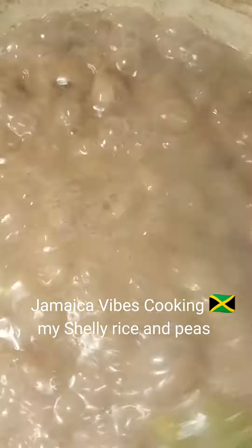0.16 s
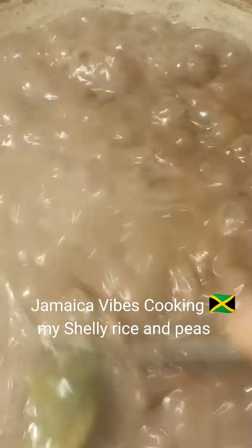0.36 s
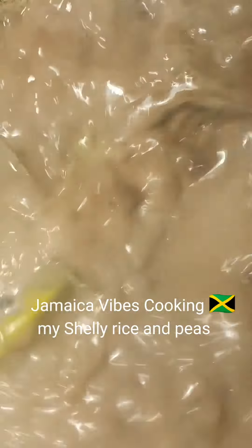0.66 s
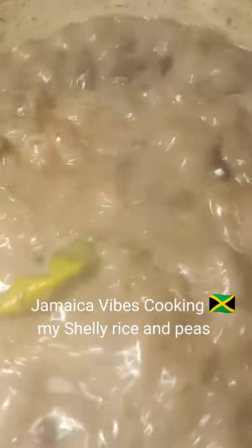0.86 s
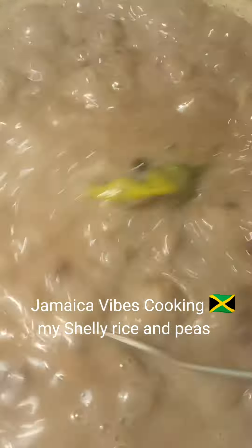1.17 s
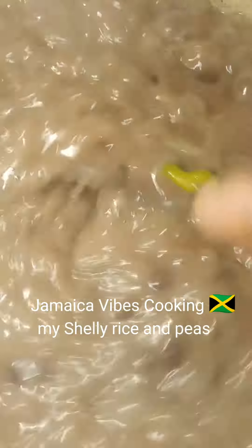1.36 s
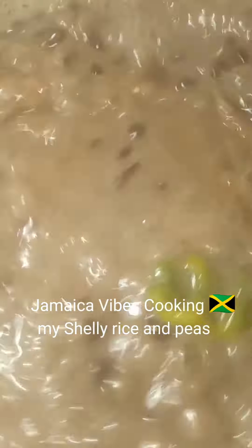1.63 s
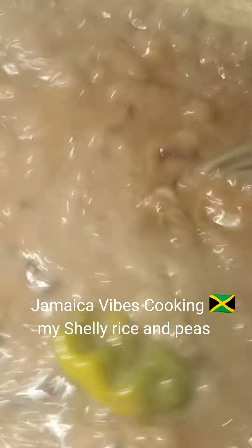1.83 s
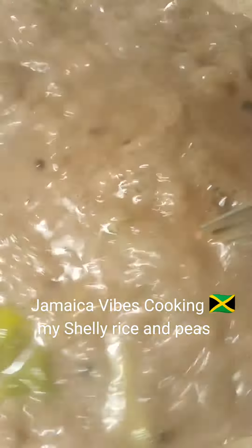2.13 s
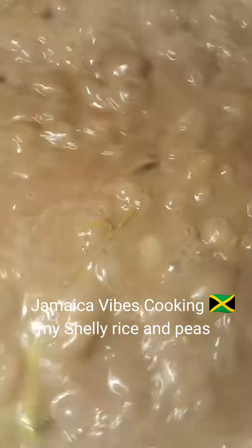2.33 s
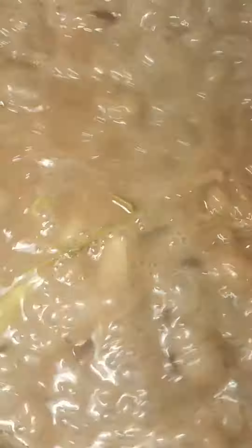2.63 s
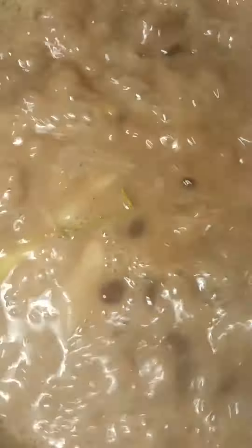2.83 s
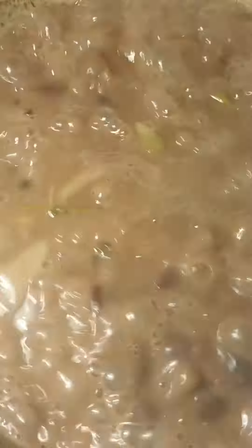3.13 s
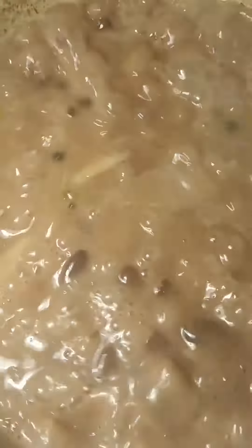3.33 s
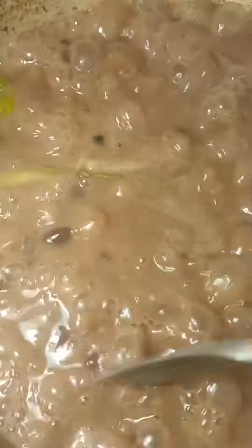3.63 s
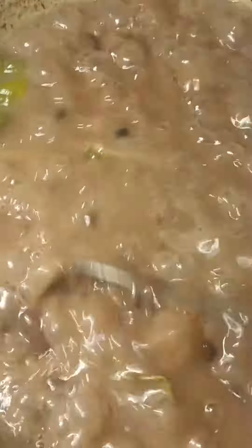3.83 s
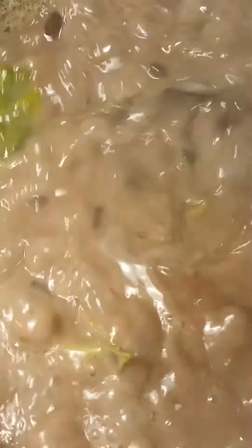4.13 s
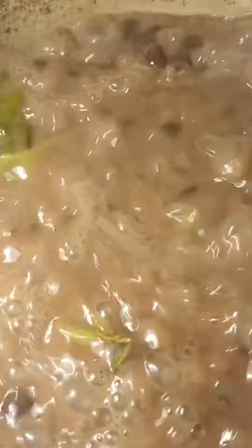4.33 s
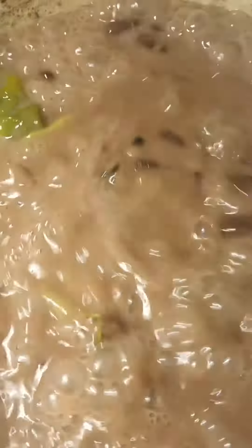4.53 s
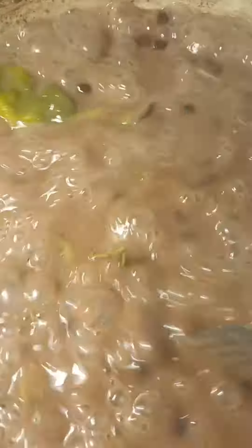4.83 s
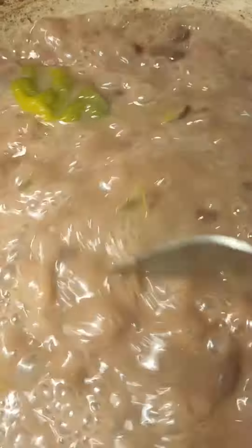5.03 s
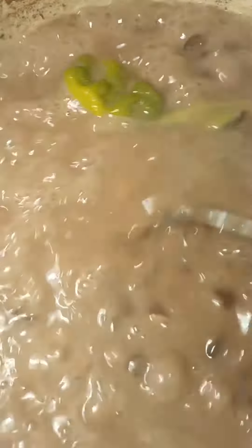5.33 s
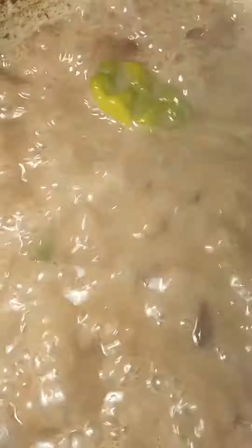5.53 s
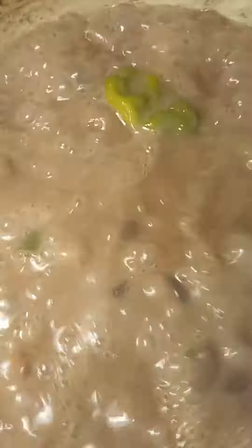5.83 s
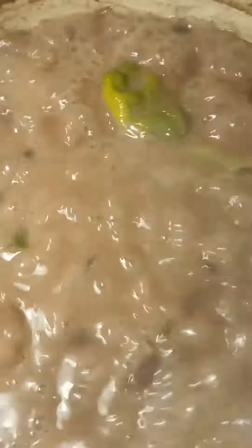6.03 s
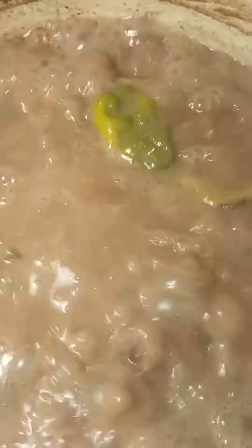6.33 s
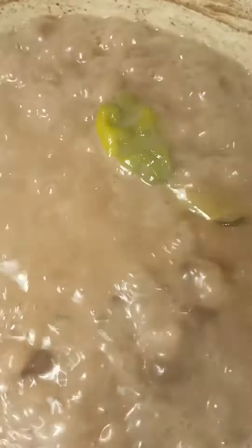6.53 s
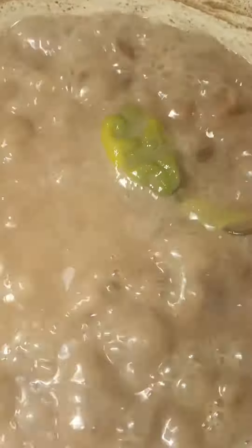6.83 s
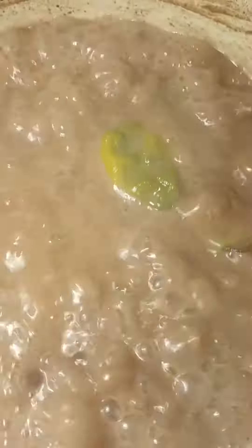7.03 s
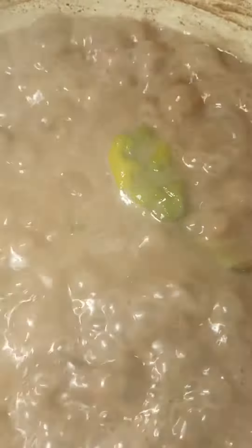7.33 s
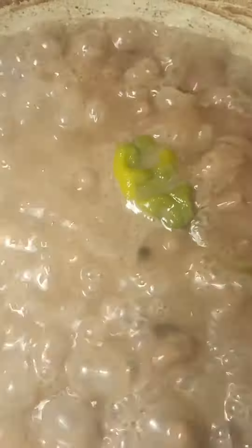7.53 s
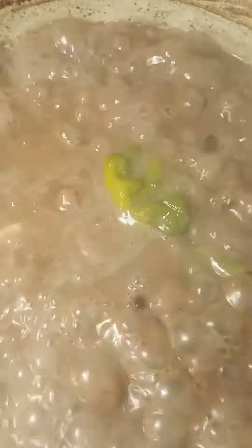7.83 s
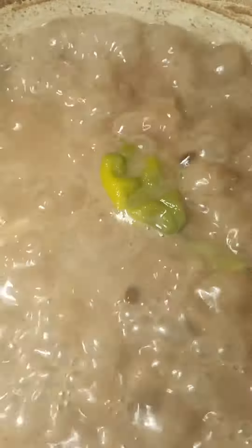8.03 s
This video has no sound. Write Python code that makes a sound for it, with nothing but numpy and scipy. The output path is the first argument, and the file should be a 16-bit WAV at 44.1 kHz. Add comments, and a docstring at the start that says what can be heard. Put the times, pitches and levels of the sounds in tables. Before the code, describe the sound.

Thick rice and beans boil vigorously, heard very close from above on a hand-held phone. Irregular wet plops, low glugs and tiny crackles ride on steady froth. Almost at once a hard scuff, click and bump hits the case; softer finger rubbing follows between two and three and a half seconds, then mostly bubbling over faint burner rumble.

```python
"""A thick pot on the boil

Thick rice and peas boil hard, heard from close above through the two microphone ports of a hand-held phone.
Steam bubbles burst as short rising tones that bounce off the pot's wall, over crackle and froth made of noise.
Fingers on the phone give a hard scuff and bump early on, then softer rubbing, squeaks and clicks:
shaped noise for the skin, fading notes for the case. Low noise and a faint hum make the burner's background."""
import sys
import numpy as np
from scipy import signal
from scipy.fft import rfft, irfft, next_fast_len
from scipy.io import wavfile

SR = 44100
rng = np.random.default_rng(int(sys.argv[2]) if len(sys.argv) > 2 else 0)


def master(y):
    """Save y as 16-bit WAV."""
    cut = np.clip(np.atleast_2d(y).T, -1, 1)
    pcm = np.round(cut * 32767)  # scale
    wavfile.write(sys.argv[1], SR, pcm.astype(np.int16))


N = 361179
TIME = np.arange(N) / SR  # s
TOP_HZ = 15700  # the phone passes little above this


def undb(db):
    """Turn decibels into a gain."""
    return 10 ** (np.asarray(db) / 20)


def unit(x):
    """Scale to an rms (average strength) of 1."""
    return x / np.sqrt(np.mean(x ** 2))


def pan(db):
    """Gains for left and right, given left minus right in dB."""
    return undb(np.array([[db], [-db]]) / 2)


def curves(table):
    """Join the points of each column into a line through time; the first column is the time in s."""
    s, *columns = np.transpose(table)
    return [np.interp(TIME, s, column) for column in columns]


def colour(x, points):
    """Make each frequency louder or softer, following a curve of (f/Hz, level/dB) points."""
    size = next_fast_len(N + 4096)
    hz, db = np.transpose(points)
    f = np.maximum(np.arange(size // 2 + 1) * SR / size, 1)
    gain = undb(np.interp(np.log(f), np.log(hz), db))
    return irfft(rfft(x, size) * gain, size)[..., :N]


def resonate(x, hz, width_hz):
    """Let one hollow or part ring: a resonance with gain 1 at its centre."""
    hz = min(hz, 0.45 * SR)
    b, a = signal.iirpeak(hz, hz / width_hz, fs=SR)
    return signal.lfilter(b, a, x)


def walk(rate):
    """Wander between random values, drawn rate times a second, with a spread near 1."""
    knots = rng.standard_normal(4096)
    return np.interp(TIME * rate, np.arange(len(knots)), knots) * np.sqrt(3 / 2)


def add(out, s, sound):
    """Mix a sound in, starting at s seconds."""
    i = max(int(s * SR), 0)
    out[:, i:i + sound.shape[1]] += sound[:, :max(N - i, 0)]


def echoes(x, decay_s, db):
    """Many close reflections blur into a fading random tail, different at each port."""
    rise_s = 0.0029
    t = TIME[:SR // 3]
    tail = rng.standard_normal((2, len(t))) * np.exp(-t / decay_s) * (1 - np.exp(-t / rise_s))
    tail /= np.sqrt(np.sum(tail ** 2, axis=1, keepdims=True))
    return undb(db) * signal.fftconvolve(x, tail, axes=1)[:, :N]


def pot():
    """Big plops, deep glugs, small blips and crackle, thrown back by the pot's wall and the kitchen."""
    # how hard the pot boils: t/s, level/dB
    boil_points = [(0, 4), (1.25, 3.5), (1.55, -0.5), (1.85, 2.5), (2.4, -1.5), (3.9, 1.5), (4.55, 5),
                   (4.9, -2.5), (5.4, .5), (7, 1.5), (8.19, 3)]
    # the loudest bubbles bursting: t/s, peak level before echoes and colouring/dB, cavity pitch f/Hz,
    # ring length/cycles
    loud_plops = [(.0622, -28.5, 627, 1.1), (.1643, -29.5, 800, 1.3), (.1832, -16.5, 2300, 2.7),
                  (.431, -33, 684, 0.89), (.4945, -31.5, 910, 1.8), (.5275, -31, 755, 2.4),
                  (.5503, -28.5, 1620, 4), (.6319, -30.5, 1180, 4.5), (.654, -33.5, 1540, 4),
                  (.7706, -35, 1660, 4.3), (1.0049, -25.5, 1155, 3.3), (1.0952, -30, 1630, 1.2),
                  (1.18, -31, 1400, 2), (1.2736, -30.5, 820, 0.61), (1.8118, -31.5, 1210, 1.9),
                  (1.868, -29, 2300, 1.9), (1.972, -34.5, 1170, 4.5), (2.3756, -32.5, 1160, 2.2),
                  (2.5556, -34, 1040, 1), (2.868, -29.5, 750, 1.2), (3.443, -19.5, 1120, 2),
                  (3.881, -31.5, 770, 1), (3.9065, -26, 2070, 0.92), (3.9758, -29.5, 950, 0.76),
                  (3.9881, -26.5, 950, 1.4), (3.9997, -29, 1150, 2.4), (4.1076, -33.5, 1530, 1.1),
                  (4.2213, -34, 1130, 2.1), (4.391, -33.5, 2240, 3.9), (4.513, -36.5, 1000, 1.6),
                  (4.6015, -32.5, 1130, 2.3), (4.6528, -28, 1160, 3.1), (5.149, -35.5, 875, 1.7),
                  (5.6664, -34, 1330, 3.6), (5.7553, -34, 1100, 1.4), (5.9627, -20, 2610, 5.4),
                  (6.054, -30, 2130, 5.6), (6.0658, -29.5, 1260, 0.93), (6.515, -35.5, 1080, 4.2),
                  (6.5382, -32.5, 966, 3.5), (6.785, -32.5, 1180, 1.4), (6.93, -37, 670, 2.5),
                  (6.984, -38, 1390, 6.5), (7.0935, -34.5, 1030, 1.6), (7.175, -29.5, 1530, 1.9),
                  (7.2246, -30, 1020, 2.3), (7.295, -31, 1220, 1.1), (7.3064, -34, 690, 1.2),
                  (7.3433, -28, 1000, 1.9), (7.53, -39.5, 2680, 7), (7.7816, -32, 1290, 1.3),
                  (7.79, -31, 1190, 1.5), (7.838, -32, 1170, 3.7), (7.8817, -32, 1300, 1.7),
                  (7.9335, -26.5, 1120, 1.1), (7.9534, -32, 990, 0.76), (8.0218, -27.5, 1160, 1.5)]
    # the air in the pot favours some pitches: f/Hz, level/dB
    pot_air = [(300, -2), (530, 1.5), (700, 3), (830, -1), (1050, 1.5), (1280, 2.5), (1500, -0.5),
               (1900, 1), (2700, -5), (3300, -3), (5000, -0.5)]

    boil_db, = curves(boil_points)
    all_plops = np.vstack([loud_plops, lesser_plops(boil_db, count=60)])
    burst = plops(all_plops)
    burst += undb(-48.0) * swarm(boil_db, hz=415, octaves=0.47, cycles=1.0, spread_db=2.5, count=600)  # glugs
    burst += undb(-48.0) * swarm(boil_db, hz=1207, octaves=0.51, cycles=0.93, spread_db=5.0, count=900)  # blips
    burst += undb(-47.0) * swarm(boil_db, hz=7300, octaves=0.56, cycles=1.7, spread_db=3.0, count=500)  # crackle

    # the pot lies a little towards the right port, so its sound reaches the left one softer and later
    burst = pan(-4) * colour(burst, pot_air)
    left_lag_s = 0.00027
    burst[0] = np.interp(TIME - round(left_lag_s * SR) / SR, TIME, burst[0])

    wall = echoes(burst, decay_s=0.0056, db=-9)
    kitchen = echoes(burst, decay_s=0.024, db=-11.5)
    return burst + wall + kitchen + froth(boil_db, pot_air)


def plops(rows):
    """Each big bubble rings at several pitches, and its skin snaps open and falls back."""
    out = np.zeros((2, N))
    chance = 2 * rng.random((len(rows), 3)) - 1
    for (s, db, hz, cycles), (place, shape, delay) in zip(rows, chance):
        gain = undb(db) * pan(2 * place)
        add(out, s, gain * bubble(hz, cycles))
        # a lopsided cavity has a second, higher mode
        add(out, s, gain * undb(-8.0) * bubble(hz * (1.227 + 0.14 * shape), cycles))
        # the opened hollow below it rings lower
        add(out, s, gain * undb(-14) * bubble(hz * 0.64, cycles / 2))
        # the skin snaps as it tears
        add(out, s, gain * undb(-8) * bubble(hz=1600, cycles=0.6))
        # it smacks again as it falls back, a few milliseconds later
        smack_s = s + 0.0065 + 0.003 * delay
        add(out, smack_s, gain * undb(-6) * bubble(hz * 0.89, cycles=0.9))
    return out


def bubble(hz, cycles, glide=0.032):
    """The cavity swells as it opens, then rings a few cycles; its pitch rises as the hole widens."""
    turn = np.arange(int(6 * cycles / hz * SR) + 2) * hz / SR  # cycles since the start
    age = turn / cycles
    swell = (1 - np.exp(-2 * age)) * np.exp(-age ** 1.56)
    tone = np.sin(2 * np.pi * turn * (1 + glide * np.tanh(age)))
    return swell / swell.max() * tone


def lesser_plops(boil_db, count):
    """Softer plops come at random, more often and louder as the boil rises; rows as in the plop table."""
    level_db, spread_db = -42.5, 1.5
    middle_hz, spread_octaves = 1146, 0.44
    ring_s = 0.0027  # the same ring time whatever the pitch
    # sharing out the steam evenly crowds the plops where the pot boils hardest
    steam = np.cumsum(undb(boil_db))
    share = (np.arange(count) + rng.random(count)) / count
    at = np.searchsorted(steam / steam[-1], share)
    size, pitch = np.clip(rng.standard_normal((count, 2)), -1.7, 1.7).T
    hz = middle_hz * 2 ** (spread_octaves * pitch)
    db = level_db + boil_db[at] + spread_db * size
    return np.column_stack([TIME[at], db, hz, hz * ring_s])


def swarm(boil_db, hz, octaves, cycles, spread_db, count):
    """Small bubbles burst at random times, sizes and places, louder as the boil rises."""
    out = np.zeros((2, N))
    chance = np.clip(rng.standard_normal((count, 4)), -1.7, 1.7)
    times = rng.random(count) * TIME[-1]
    for s, (pitch, size, ring, side) in zip(times, chance):
        f = min(hz * 2 ** (octaves * pitch), TOP_HZ)
        gain = undb(boil_db[int(s * SR)] + spread_db * size)
        add(out, s, gain * pan(3 * side) * bubble(f, cycles * 2 ** (ring / 2)))
    return out


def froth(boil_db, pot_air):
    """Countless tiny bubbles merge into a flickering noise."""
    # spectrum of the froth: f/Hz, level/dB
    simmer = [(60, -24), (300, -16), (700, 1.5), (1200, -3), (1700, -5), (2500, -2.5), (3500, -5),
              (6000, -7.5), (10000, -8), (16000, -10.5)]
    flicker = rng.standard_normal((2, N)) * undb(1.46 * walk(120))
    hiss = unit(colour(colour(flicker, simmer), pot_air))
    # it follows only part of the boil's swell
    return hiss * undb(-52 + 0.29 * boil_db + 0.5 * walk(13))


def rubbing():
    """Skin catches and slips in tiny grains at each port; pressure makes the whole case thud."""
    # the pot and room ring narrowly through the rubbing: f/Hz, width/Hz, level/dB
    rub_modes = [(1770, 180, 4.5), (2470, 490, -9), (3650, 180, -11)]
    # spectrum of skin on the case: f/Hz, level/dB
    skin_spectrum = [(150, -12), (500, -4.5), (900, -3), (1800, -3), (3000, -0.5), (4500, 2), (6200, 0.5),
                     (8000, -5), (12000, -3.5), (16000, -4.5)]
    # spectrum of the pressed case: f/Hz, level/dB
    thud_spectrum = [(30, -16), (110, -26.5), (170, -12), (240, -13), (330, 0), (420, -8.5), (600, -17),
                     (1500, -41)]

    friction, pressure, brightness = strokes()
    grain_db = 6.3 * rng.standard_normal((2, N)) + 1.84 * walk(250)
    grains = rng.standard_normal((2, N)) * undb(grain_db)
    grains = grains + sum(undb(db) * resonate(grains, hz, width) for hz, width, db in rub_modes)
    # short, close echoes off the pot ripple the spectrum of the rubbing
    grains = grains + echoes(grains, decay_s=0.0043, db=-1.0)

    # the treble has its own level in each stroke
    scrape = unit(colour(grains, skin_spectrum))
    treble_filter = signal.butter(3, 7000, "high", fs=SR, output="sos")
    treble = signal.sosfiltfilt(treble_filter, scrape)
    body = pan(2.9) * (scrape - treble) * friction * undb(-2.85)
    scrape = body + treble * brightness * undb(4.5)

    thud = unit(colour(rng.standard_normal(N), thud_spectrum)) * pressure * undb(-3.0)

    # under a hard press the skin judders, and a coarse rasp grows faster than the hiss
    judder = rng.standard_normal((2, N)) * undb(4.6 * walk(300))
    coarse = unit(resonate(resonate(judder, 1010, 1050), 1010, 1050))
    rasp = pan(4.0) * coarse * undb(4) * friction ** 1.66
    return scrape + rasp + thud


def strokes():
    """Each stroke swells, holds and dies away; overlaps add in power. Gains of friction, thud and treble."""
    # fingers dragging over the case, with levels before the final balance: start t/s, attack/s, hold/s,
    # friction level/dB, thud level/dB, treble level against the friction/dB
    drags = [(0.113, .02, .05, -45.5, -54, 0.5), (0.195, 0.017, 0.042, -20, -21, -4),
             (0.286, 0.039, 0.047, -36, -62, -2), (2.051, 0.02, 0.08, -41, -54, -3),
             (2.188, 0.078, .015, -44, -65, -3.5), (2.328, .012, 0.031, -39.5, -60, -3),
             (2.424, 0.13, 0.085, -45, -60, -5.5), (2.636, 0.008, .015, -38, -47, 0.5),
             (2.687, 0.086, 0.027, -32.5, -36.5, -7), (2.792, 0.02, 0.094, -37, -44.5, -3),
             (2.938, 0.067, 0.075, -39.5, -55, -3.5), (3.056, 0.057, 0.017, -34.5, -62, 3),
             (3.171, 0.094, 0.094, -37, -54, -5), (3.37, 0.035, 0.027, -32, -43, -6),
             (6.26, 0.033, .01, -38.5, -55, -8), (6.41, 0.07, .02, -44.5, -62, -8.5)]
    release_s = 0.032  # a finger lifts off: time to fall to 1/e, about a third
    power = np.zeros((3, N))
    for s, attack_s, hold_s, friction_db, thud_db, treble_db in drags:
        press = np.clip((TIME - s) / attack_s, 0, 1)
        lift = np.exp(-np.clip(TIME - s - attack_s - hold_s, 0, 1) / release_s)
        gains = undb([friction_db, thud_db, friction_db + treble_db])
        power += np.outer(gains, press * lift) ** 2
    return np.sqrt(power)


def bumps():
    """Soft flesh pushes the case slowly, so each low note swells before it dies."""
    # fingers pressing or landing: t/s, pitch f/Hz, decay/s, level before the swell and fade/dB
    presses = [(.236, 349, .021, -13.5), (2.059, 288, 0.015, -33.5), (2.489, 90.5, 0.011, -33),
               (2.699, 305, 0.028, -29), (2.787, 171, 0.05, -33.5), (3.022, 83.4, 0.032, -35)]
    out, t = np.zeros((2, N)), TIME[:SR // 3]
    for s, hz, decay_s, db in presses:
        swell = (1 - np.exp(-t / 0.008)) * np.exp(-t / decay_s)
        add(out, s, pan(2.8) * undb(db) * swell * np.sin(2 * np.pi * hz * t))
    return out


def squeaks():
    """Light slides of skin: a narrow or wide band of hiss that starts quickly and fades."""
    # skin squeaks and hisses: t/s, fade length/s, level before the fade/dB, centre f/Hz, width/Hz
    slides = [(0.13, .06, -41, 5360, 900), (0.48, 0.062, -36, 13900, 1100), (.4825, .055, -40, 10100, 4000),
              (0.825, 0.05, -45, 3130, 200), (.964, .014, -39, 5840, 700), (0.965, 0.011, -43, 11400, 5000),
              (1.185, 0.042, -45, 8500, 7060), (1.2, 0.25, -51.5, 12100, 4500),
              (2.262, .026, -46, 2550, 600), (3.093, 0.06, -42.5, 2645, 450), (3.215, .04, -41, 14100, 900)]
    out = np.zeros((2, N))
    for s, length, db, hz, width_hz in slides:
        t = TIME[:int(2 * length * SR)]
        # slow complex noise, moved up to the centre pitch, becomes a band of hiss
        b, a = signal.butter(2, min(width_hz, SR / 2) / 2, fs=SR)
        noise = rng.standard_normal((2, SR)) + 1j * rng.standard_normal((2, SR))
        waver = signal.lfilter(b, a, noise)[:, :len(t)]
        hiss = unit(np.real(waver * np.exp(2j * np.pi * hz * t)))
        fade = (1 - np.exp(-t / 0.00068)) * np.exp(-(t / length) ** 2 * 0.87)
        add(out, s, pan(-0.35) * undb(db) * hiss * fade)
    return out


def clicks():
    """A nail ticks on the case: a bright crack and its short ring."""
    # sharp clicks: t/s, level before the fade/dB, decay/s, extra level of the lowest mode/dB,
    # left minus right/dB, crack centre f/Hz
    ticks = [(0.2341, -11, 0.0038, -5, -1, 7000), (2.3385, -23, 0.0017, -15, -13, 5500),
             (4.4438, -24.5, 0.01, 6.5, 1, 13500), (4.472, -33.5, 0.0024, 2, -4, 8000)]
    # what a click rings with: f/Hz, level/dB
    case_modes = [(715, -11.5), (3650, -12.5), (5750, -9.5), (6300, -12.5)]
    out, t = np.zeros((2, N)), TIME[:SR // 10]
    for s, db, decay_s, lowest_db, side_db, crack_hz in ticks:
        crack = unit(resonate(rng.standard_normal((2, len(t))), crack_hz, 8500))
        ring = [undb(mode_db) * np.sin(2 * np.pi * hz * t) for hz, mode_db in case_modes]
        # each tick has its own share of the lowest mode
        tick = crack + undb(lowest_db) * ring[0] + sum(ring[1:])
        add(out, s, pan(side_db) * undb(db) * np.exp(-t / decay_s) * tick)
    return out


def stove():
    """The burner's rumble, nearly alike at both ports, warm air stirring at each, and a faint mains hum."""
    # spectrum of the burner: f/Hz, level/dB
    burner = [(20, -1), (35, -12), (52, 10), (72, -0.5), (120, 3), (175, 3), (230, -7.5), (320, -3),
              (450, -5), (700, -25), (2000, -36)]
    noise = rng.standard_normal(N) + 0.19 * rng.standard_normal((2, N))
    rumble = unit(colour(noise, burner)) * undb(-52.5)
    air = [(8, -13), (30, -1), (65, -7), (160, -40), (900, -62)]  # f/Hz, level/dB
    draught = undb(-61) * unit(colour(rng.standard_normal((2, N)), air))
    hum_tones = [(50, -60.5), (200, -64.5), (300, -62.5)]  # f/Hz, level/dB
    hum = sum(undb(db) * np.sin(2 * np.pi * hz * TIME) for hz, db in hum_tones)
    return pan(-0.53) * (rumble + draught + hum)


def scene():
    """The pot on its stove, and the hand that holds the phone."""
    return pot() + stove() + rubbing() + bumps() + squeaks() + clicks()


def record(dry):
    """The two ports colour the treble; the phone rounds the loudest peaks and cuts the top."""
    # each microphone port has its own resonances: f/Hz, level/dB
    left_port = [(1200, 2.5), (2200, 8), (5200, 0.5), (6600, 6), (7400, -3), (8300, -15.5), (9900, 0),
                 (11300, -4.5), (12600, -2.5), (13700, 4), (15500, -2.5)]
    # the same for the right port: f/Hz, level/dB
    right_port = [(1200, 2), (2200, 5.5), (5200, 0.5), (7100, -4.5), (8200, 6.5), (9300, 3), (10000, 3.5),
                  (12300, -1.5), (13500, -6.5), (15000, -46)]
    heard = np.tanh([colour(dry[0], left_port), colour(dry[1], right_port)])
    top_cut = signal.ellip(10, 0.2, 80, TOP_HZ, fs=SR, output="sos")
    return signal.sosfilt(top_cut, heard)


dry = scene()
out = record(dry)
master(out)
```